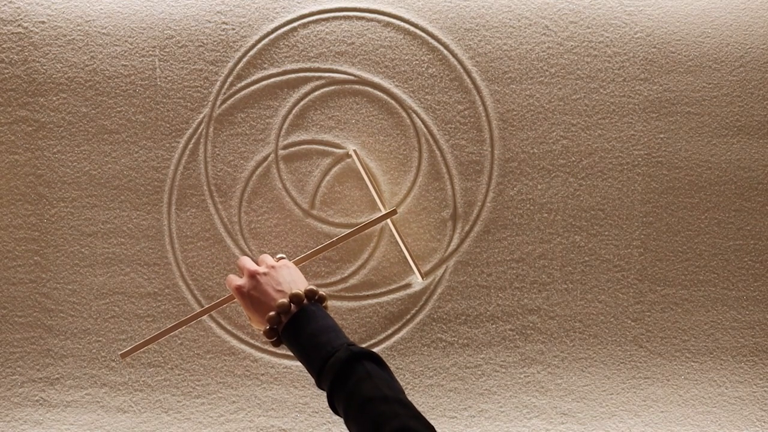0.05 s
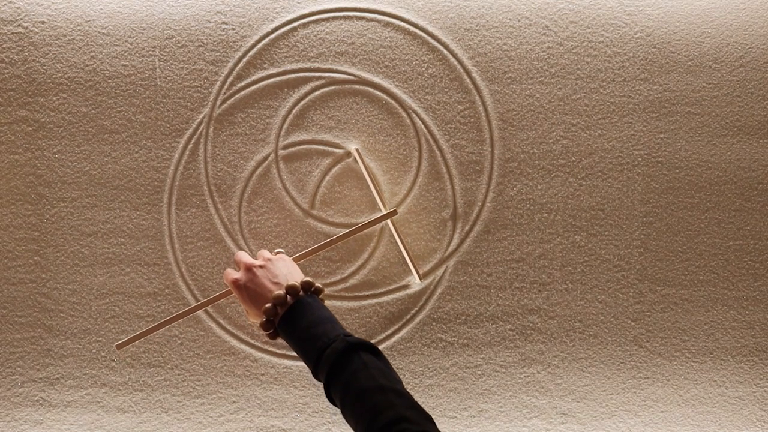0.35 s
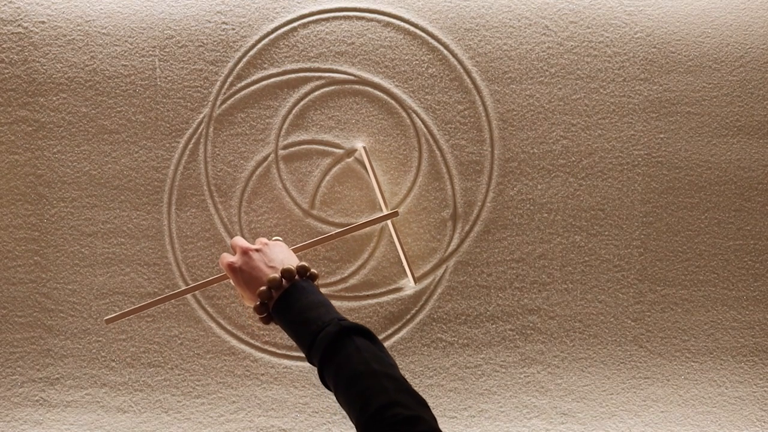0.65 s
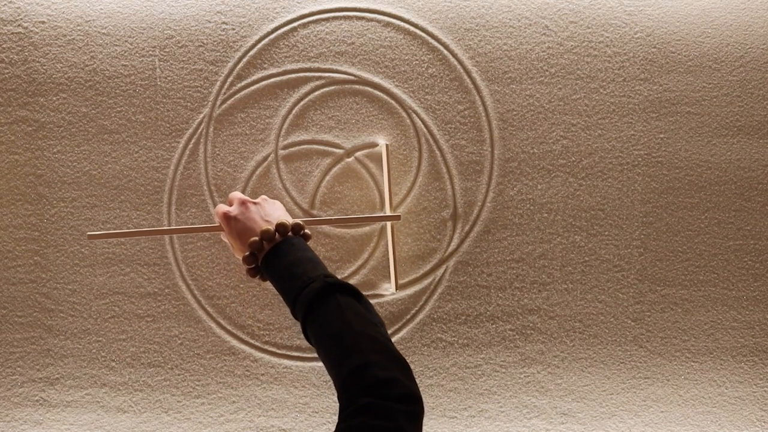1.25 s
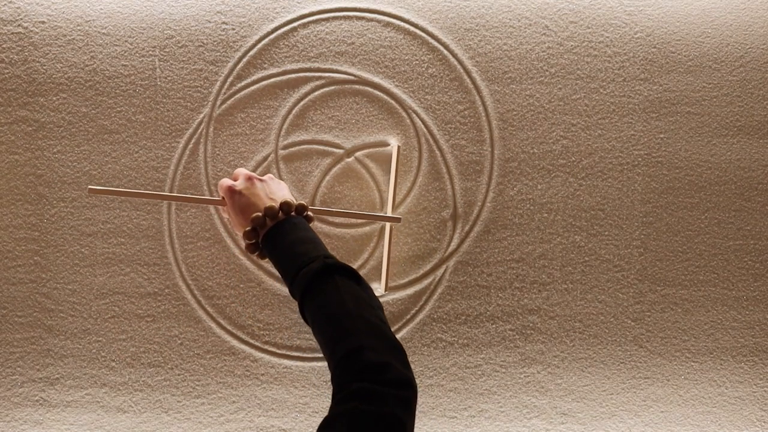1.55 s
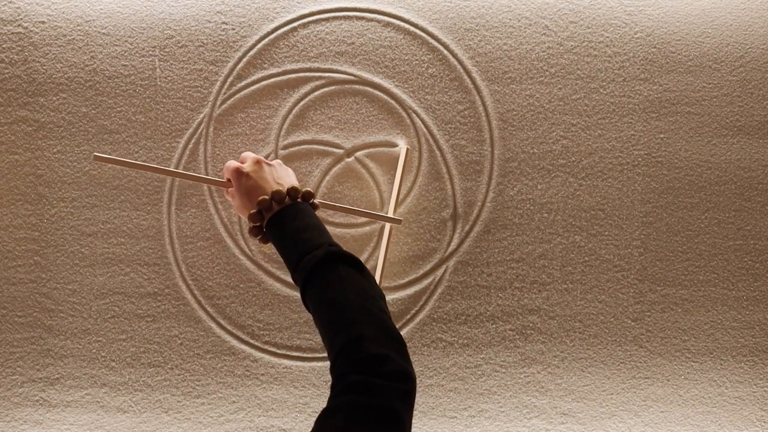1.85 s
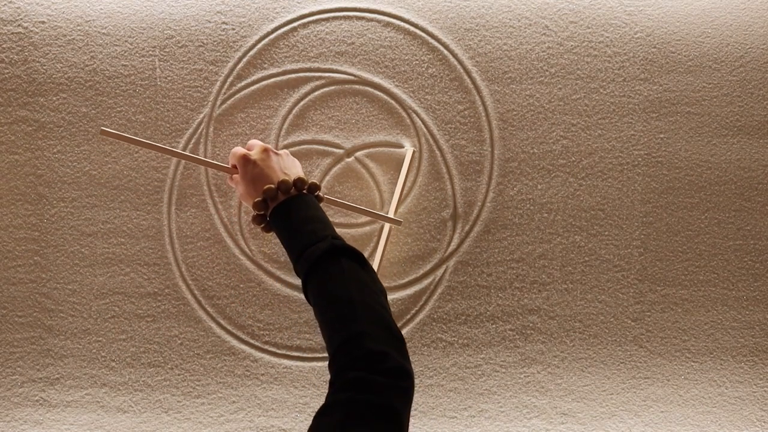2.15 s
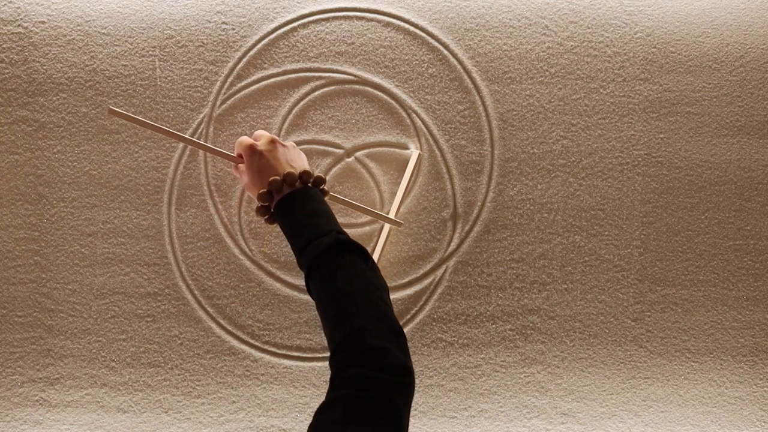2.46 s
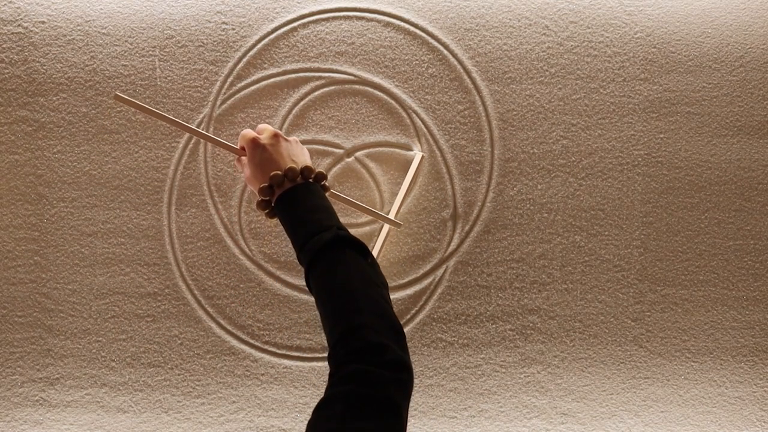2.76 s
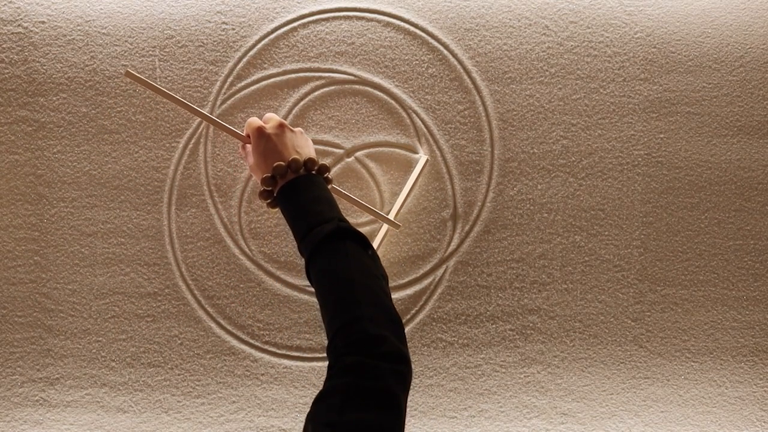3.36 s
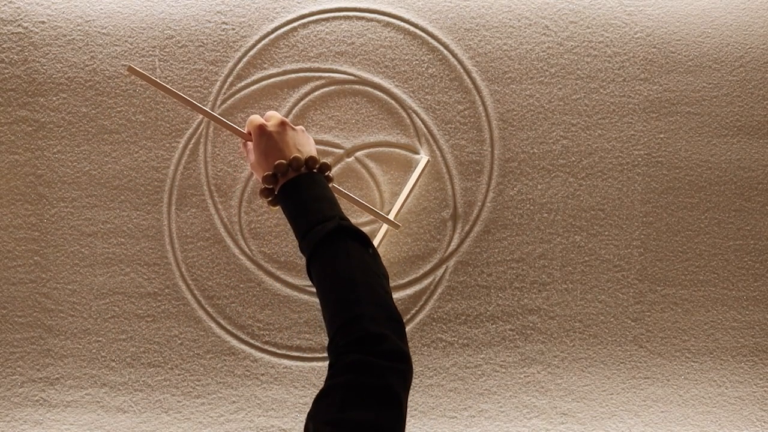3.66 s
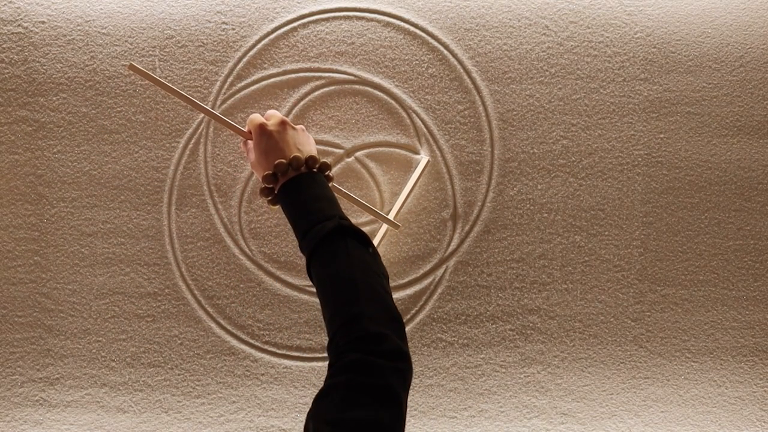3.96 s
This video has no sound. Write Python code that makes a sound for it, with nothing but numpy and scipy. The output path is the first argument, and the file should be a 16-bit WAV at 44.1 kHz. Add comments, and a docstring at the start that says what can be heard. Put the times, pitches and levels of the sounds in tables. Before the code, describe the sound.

A wooden compass scrapes through fine sand with a grainy hiss, small crunches and knocks.

```python
"""Wooden compass through sand

Close on a shallow tray of fine sand, stereo pair, in a small, quiet room that hums. A wooden compass is
drawn slowly along and loose grains hiss against the stick. After a second its tip reaches the tray floor
and grinds in small slips, crushing coarse grains and knocking on the board; then it slows to a stop."""
import sys
import numpy as np
from scipy import signal
from scipy.fft import rfft, irfft
from scipy.io import wavfile

SR = 44100
rng = np.random.default_rng(int(sys.argv[2]) if len(sys.argv) > 2 else 0)


def put_to_file(sound):
    """Save the sound as 16-bit audio at rate SR, in the file named by the first command-line argument."""
    columns = np.atleast_2d(sound).T  # one column per channel
    safe = np.clip(columns, -1, 1)
    whole_steps = np.round(safe * 32767)
    wavfile.write(sys.argv[1], SR, whole_steps.astype(np.int16))


N = 176400
TIME, HZ = np.arange(N) / SR, np.fft.rfftfreq(N, 1 / SR)
FINE_GRAINS_PER_S, FINE_SPREAD_DB = 14000, 3.5
# spectrum of breaking grains [f/Hz, level/dB]
BREAKING_COLOUR = [(120, -14.5), (600, 3.5), (900, -6), (1350, 2), (1800, -4), (2300, 0), (2800, -4.5),
                   (3400, -2.5), (4300, -7.5), (5500, -1.5), (7000, -7), (9600, -15.5), (13000, -6),
                   (15400, -4.5)]


def amp(db):
    """Decibels to gain."""
    return 10 ** (np.asarray(db) / 20)


def unit(x):
    """Scales to rms 1."""
    return x / np.sqrt(np.mean(abs(x) ** 2) + 1e-20)


def over_hz(points):
    """A table over frequency, joined on a log axis."""
    f, value = np.transpose(points)
    return np.interp(np.log(HZ + 1), np.log(f + 1), value)


def fader(points):
    """A dB curve over time as gain."""
    return amp(np.interp(TIME, *np.transpose(points)))


def add(mix, s, sound):
    """Adds a sound at time s."""
    part = mix[round(s * SR):][:len(sound)]
    part += sound[:len(part)]


def body(colour_db):
    """Causal frequency response of unit power with the given colour."""
    log_gain = np.log(unit(amp(colour_db)))
    mirrored = np.r_[log_gain, log_gain[-2:0:-1]]
    return np.exp(np.conj(signal.hilbert(mirrored)))[:len(HZ)]


def wander(rate_hz):
    """Random motion of rms 1, up to the given rate."""
    return unit(irfft(rfft(rng.standard_normal(N)) / np.sqrt(1 + (HZ / rate_hz) ** 4), N))


def shelf(x, hz, db):
    """Lifts or cuts the treble above hz."""
    low = signal.sosfilt(signal.butter(1, hz, fs=SR, output="sos"), x)
    return low + amp(db) * (x - low)


def echoes(x, t60):
    """Diffuse reflections, different at each microphone, falling 60 dB in t60 seconds."""
    t = TIME[:SR // 2]
    tail = rng.standard_normal((2, len(t))) * amp(-60 * t / t60) * np.minimum(t / 0.012, 1)
    return signal.fftconvolve(x[None], tail / np.linalg.norm(tail[0]), axes=1)[:, :N]


def pair(shared, opposed, correlation):
    """Left and right spectra from a shared part and an opposed part."""
    c = over_hz(correlation)
    return np.sqrt((1 + c) / 2) * shared + np.array([[1], [-1]]) * np.sqrt((1 - c) / 2) * opposed


def hum(hz, waver_hz):
    """Machinery in the building: a wavering low tone of rms 1, a little later on the right."""
    phase = 2 * np.pi * np.cumsum(hz + waver_hz * wander(rate_hz=4.0)) / SR
    return np.sqrt(2) * np.sin([phase, phase - .7])


def room_tone():
    """Soft rumble and hiss under a few hums; the main hum holds on the left and fades on the right."""
    air_colour = [(15, -10), (60, -10.5), (110, -11.5), (160, -13), (230, -17.5), (400, -24), (700, -30),
                  (1100, -37), (5000, -46), (14800, -46.5), (15500, -40)]  # spectrum of the room's air [f/Hz, level/dB]
    air_likeness = [(40, 0.69), (1500, 0.1), (15000, 0)]  # likeness of left and right [f/Hz, correlation/0-1]
    hums = [(38.14, -54, 0.99, -4), (41.5, -65, 1, -3), (88.2, -63.5, 0.96, 1)]  # lesser hums [f/Hz, level/dB, waver/Hz, left minus right/dB]
    main_hum_right = [(.5, -44.5), (2.2, -49.5), (3.6, -59.5)]  # main hum at the right microphone [t/s, level/dB]
    noise = pair(*rfft(rng.standard_normal((2, N))), air_likeness)
    room = amp(-52.5) * irfft(noise * body(over_hz(air_colour)), N)
    for hz, db, waver_hz, pan_db in hums:
        room += amp([[db + pan_db / 2], [db - pan_db / 2]]) * hum(hz, waver_hz)
    main_gain = np.array([np.full(N, amp(-51.5)), fader(main_hum_right)])
    return room + main_gain * hum(hz=81.65, waver_hz=0.33)


def grains(per_s, spread_db, count=N):
    """Random grain impacts: many small, a few large."""
    sizes = amp(spread_db * np.minimum(rng.exponential(1, count), 5))
    return unit(sizes * rng.choice([-1, 1], count) * (rng.random(count) < per_s / SR))


def ring_stick(impacts, colour):
    """Two trains of impacts ring the stick and tray, whose resonances shift as the compass turns."""
    stages = [.4, 1.15, 2.9]  # early, middle and late stage of the stroke [t/s]
    resonances = [(2254, 196, 8.9, 9, 5.2), (2570, 45, 5.6, 3.7, 6.3), (6115, 224, 9.3, 7.4, 8.1),
                  (7930, 170, 13, 2.6, 3.5), (10330, 230, 1.8, 8, 2.7), (15500, 430, 12, 6.7, 5.3)]  # modes of the stick [f/Hz, half width/Hz, boost/dB at each stage]
    sand_likeness = [(100, 0.28), (600, 0.92), (2300, 1), (8000, 0.73), (15000, 0.46)]  # likeness of left and right [f/Hz, correlation/0-1]
    spectra = 0
    for stage, weights in enumerate(np.eye(len(stages))):
        crossfade = np.interp(TIME, stages, weights)
        ring_db = sum(db[stage] / (1 + ((HZ - hz) / width) ** 2) for hz, width, *db in resonances)
        spectra += pair(*rfft(impacts * crossfade), sand_likeness) * body(over_hz(colour) + ring_db)
    return irfft(spectra, N)


def crackle():
    """As the stroke slows, small grains break at random, each in a very short spray of fragments."""
    crackle_level = [(1.3, -85), (2.1, -59.5), (3.3, -60.5), (3.85, -84)]  # rise and fall of the crackle [t/s, level/dB]
    decay_s = 0.0017
    breaks = abs(grains(per_s=130, spread_db=2.0))
    sprays = unit(signal.lfilter([1], [1, -np.exp(-1 / (decay_s * SR))], breaks))
    fragments = np.array([grains(FINE_GRAINS_PER_S, FINE_SPREAD_DB) for _ in range(2)])
    return ring_stick(fragments * sprays * fader(crackle_level), BREAKING_COLOUR)


def crunches():
    """A coarse grain cracks under the tip and its fragments skitter for a few milliseconds."""
    crushed = [(0.4708, -40.5, -17), (1.2057, -36.5, -24), (1.3843, -33, -36), (1.4615, -36.5, -30),
               (1.5671, -31, -37), (1.5865, -36.5, -32), (1.6163, -34.5, -40), (1.6314, -34, -41),
               (1.7237, -40.5, -39), (1.7625, -32, -35), (1.8052, -30.5, -36), (1.8552, -33.5, -22),
               (2.0031, -34.5, -40), (2.121, -36, -24), (2.2817, -35.5, -37), (2.3353, -33.5, -46),
               (2.3995, -36, -20), (2.4095, -34.5, -26), (2.454, -34.5, -28), (2.512, -39.5, -25),
               (2.54, -37.5, -20), (2.5626, -36.5, -33), (2.632, -35, -18), (2.6385, -33, -31),
               (2.7176, -41.5, -23), (2.7429, -35, -36), (2.748, -33.5, -27), (2.805, -36, -18),
               (3.057, -39.5, -17), (3.1323, -41, -21), (3.2546, -45, -14), (3.3465, -46.5, -8),
               (3.415, -33, -28), (3.4358, -38.5, -21), (3.482, -52, 4.5), (3.715, -46.5, -13),
               (3.9683, -36, -13)]  # coarse grains [t/s, relative level/dB, brightness/dB]
    decay_s, crack, neutral_db = 0.0053, 0.51, -23
    t, impacts = TIME[:SR // 25], np.zeros((2, N))
    for s, db, brightness_db in crushed:
        treble_db = 0.7 * (brightness_db - neutral_db)
        for train in impacts:
            burst = grains(per_s=4000, spread_db=3.5, count=len(t)) * np.exp(-t / decay_s)
            burst /= np.linalg.norm(burst)
            burst[SR // 1000] += crack * rng.choice([-1, 1])
            add(train, s, amp(db + 12.5) * shelf(burst, hz=8500, db=treble_db))
    return ring_stick(impacts, BREAKING_COLOUR)


def knocks():
    """Each blow spreads through the board treble first and bounces off its edges: a tick and a thud."""
    strikes = [(1.0409, -15, 7.5, 2), (1.1826, -13.5, -6, -11), (1.444, -11, -8, -16),
               (1.889, -13, -4, 5.5), (2.1205, -18, -23, 6.5), (2.4111, -27.5, 5, 11.5)]  # tip on the tray floor [t/s, level/dB, treble/dB, bass/dB]
    board_colour = [(50, -10), (120, 13.5), (330, 4.5), (500, 8), (700, 6), (850, -8), (1100, 1),
                    (1600, -20), (2600, -8), (3300, -14), (4200, -0.5), (5400, -38), (8000, -7),
                    (11500, -15.5)]  # hollow spectrum of the board [f/Hz, level/dB]
    edge_paths = [(1.752, -0.32), (2.601, 0.4), (4.2, -0.46)]  # reflections from the edges [length/direct path, gain]
    bend_s, bend_hz, sand_damping_hz = .0042, 510, 1210
    blows, tap = np.zeros(N), signal.unit_impulse(SR // 50)
    for s, db, treble_db, bass_db in strikes:
        tick = shelf(tap, hz=1100, db=treble_db)
        add(blows, s, amp(db + bass_db) * shelf(tick, hz=170, db=-bass_db))
    # bending waves: the delay falls with the root of frequency
    phase = 4 * np.pi * bend_s * np.sqrt(bend_hz) * (np.sqrt(HZ) - HZ / np.sqrt(2 * SR))
    board = np.exp(-1j * phase)
    for length, gain in edge_paths:  # longer paths lose their treble under the sand
        board += gain * np.exp(-1j * length * phase - (length - 1) * HZ / sand_damping_hz)
    thuds = irfft(rfft(blows) * body(over_hz(board_colour)) * board, N)
    return thuds + amp(-1.5) * echoes(shelf(thuds, hz=600, db=-6), t60=0.072)


def grind():
    """The tip sticks and slips on the tray floor, so its grains come in clumps."""
    grind_level = [(0, -87), (.85, -65), (1.05, -57), (1.3, -52.5), (1.5, -49), (1.65, -51), (1.72, -54),
                   (1.83, -50), (1.95, -55), (2.15, -53), (2.5, -63.5), (2.9, -62.5), (3.3, -73),
                   (3.7, -91), (3.85, -89), (4, -77)]  # grinding over the stroke [t/s, level/dB]
    grind_colour = [(80, -26), (250, -4), (660, -1), (850, -11.5), (1350, -8.5), (1700, -12), (2250, -4.5),
                    (2800, -11), (3600, -20), (4150, -12), (4800, -24), (6900, -11), (9500, -18),
                    (11300, -23.5), (14000, -16), (16000, -24)]  # spectrum of the grinding tip [f/Hz, level/dB]
    slip_db = 5
    impacts = np.array([grains(per_s=7000, spread_db=4.5) for _ in range(2)])
    slips = unit(amp(slip_db * np.minimum(wander(rate_hz=76), 2)))
    return ring_stick(impacts * slips * fader(grind_level), grind_colour)


def flow():
    """Dense fine grains hiss against the stick, smoothly at speed and in fits when it moves slowly."""
    flow_level = [(0, -81), (.2, -67.5), (.3, -57.5), (.45, -54.5), (.85, -55.5), (1.05, -53), (1.6, -59.5),
                  (1.85, -57.5), (2.1, -60.5), (2.6, -60), (3.1, -62.5), (3.45, -62.5), (3.62, -66.5),
                  (3.73, -62.5), (3.85, -77.5), (4, -59)]  # loose sand running round the tip [t/s, level/dB]
    flow_colour = [(200, -29), (600, -16), (1200, -7.5), (1850, -9.5), (2300, -4), (3000, -1), (3700, -8.5),
                   (4700, -7.5), (6400, -5), (7400, -9.5), (9500, -14.5), (12300, -8.5), (13800, -3.5),
                   (15500, -8.5)]  # spectrum of running sand [f/Hz, level/dB]
    flutter = [(.3, 4.5), (.55, 0.1), (1.6, 0.5), (2.5, 0.5), (3.7, 4.5)]  # unevenness of the flow [t/s, depth/dB]
    impacts = np.array([grains(FINE_GRAINS_PER_S, FINE_SPREAD_DB) for _ in range(2)])
    fits = unit(fader(flutter) ** np.minimum(wander(rate_hz=45.7), 2))
    return ring_stick(impacts * fader(flow_level) * fits, flow_colour)


def scene():
    """The tray close to the microphone pair, slightly to the left, in a small room."""
    right_lag = [(100, 0.000037), (2300, 0.000011), (7000, 0.000012), (10000, 0.000027)]  # later arrival at the right microphone [f/Hz, delay/s]
    left, right = flow() + grind() + crackle() + crunches() + knocks()
    right = irfft(rfft(right) * np.exp(-2j * np.pi * HZ * over_hz(right_lag)), N)
    return np.array([left, right]) + amp(-16) * echoes(left, t60=.2) + room_tone()


def record(dry):
    """The pair's left-right balance varies with frequency, and the top treble is cut off steeply."""
    balance = [(60, 5), (140, -1), (350, -2.5), (1400, 0.5), (7000, -.8), (15000, .5)]  # microphone balance [f/Hz, left minus right/dB]
    side_gains = amp(np.array([[1], [-1]]) * over_hz(balance) / 2)
    heard = irfft(rfft(dry) * side_gains, N)
    lowpass = signal.firwin(511, cutoff=15850, window=("kaiser", 9), fs=SR)
    return signal.oaconvolve(heard, lowpass[None], "same")


dry = scene()
out = record(dry)
put_to_file(out)
```